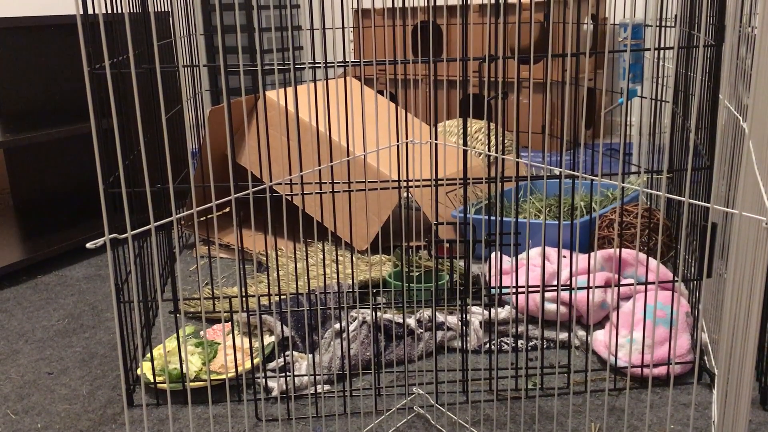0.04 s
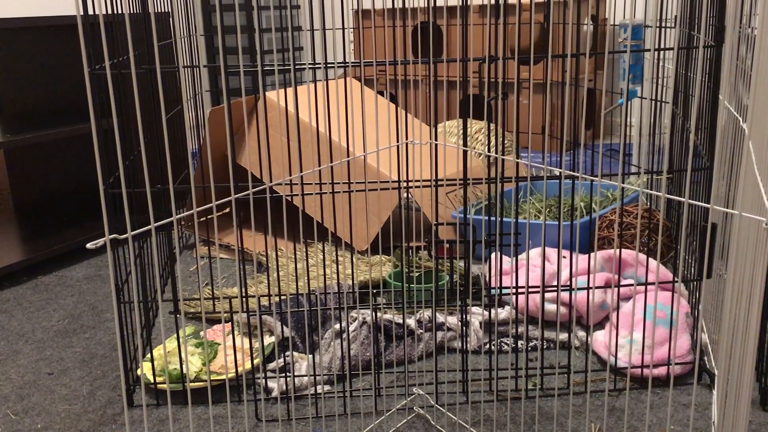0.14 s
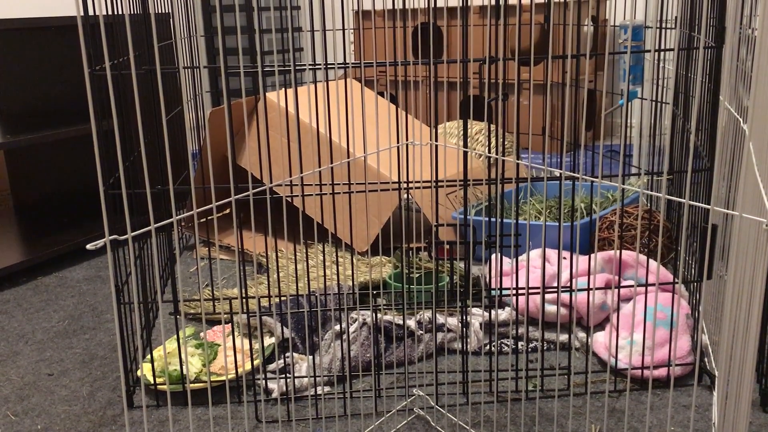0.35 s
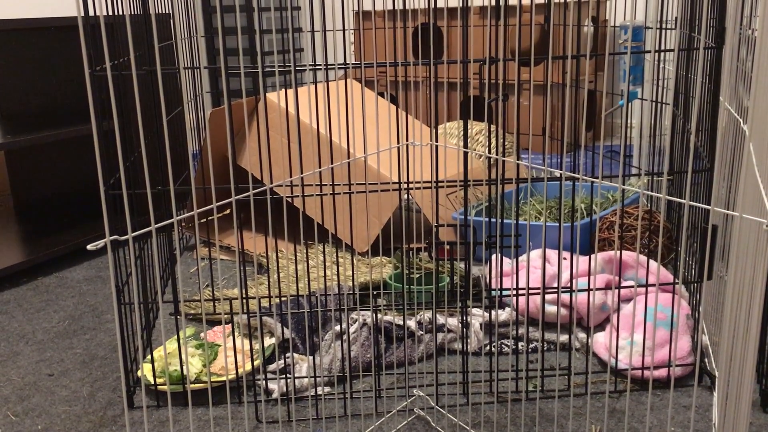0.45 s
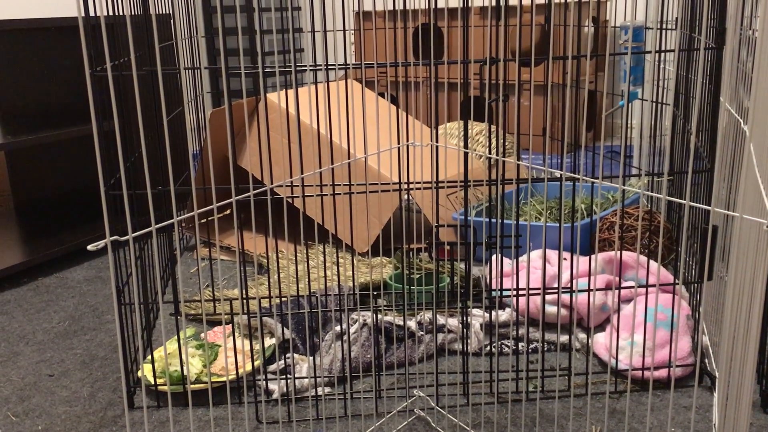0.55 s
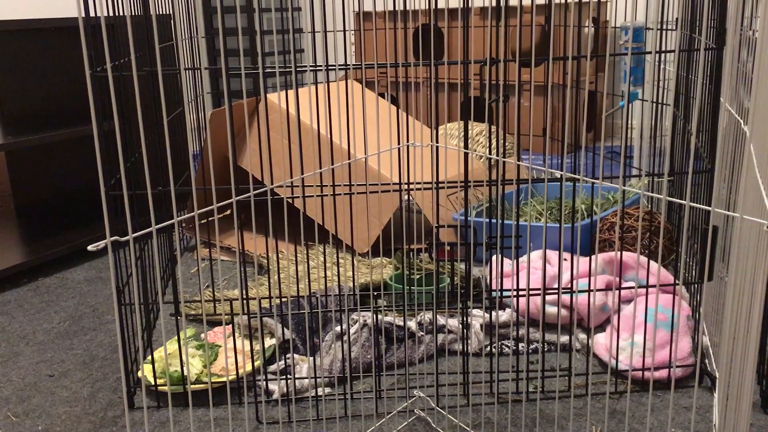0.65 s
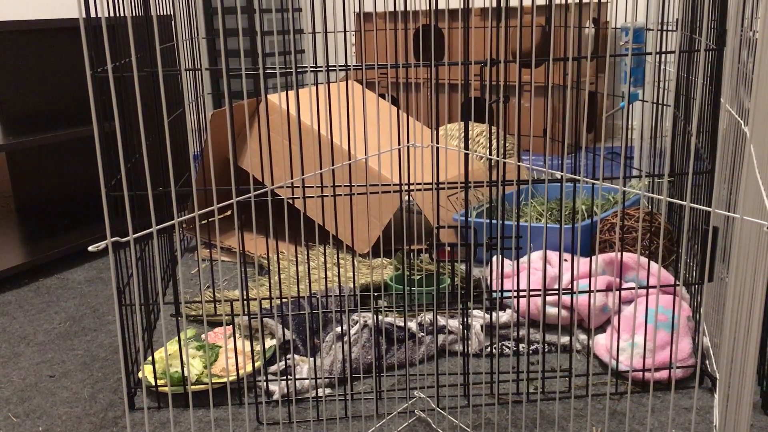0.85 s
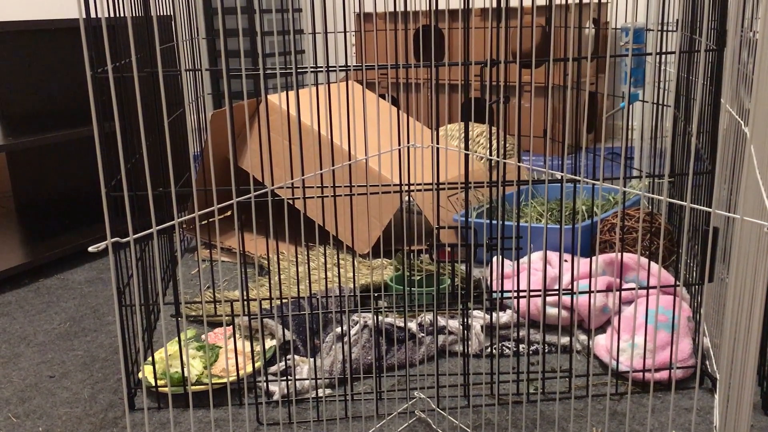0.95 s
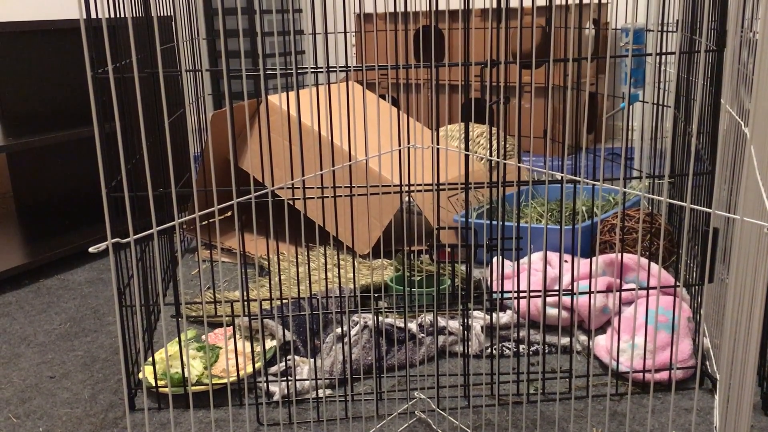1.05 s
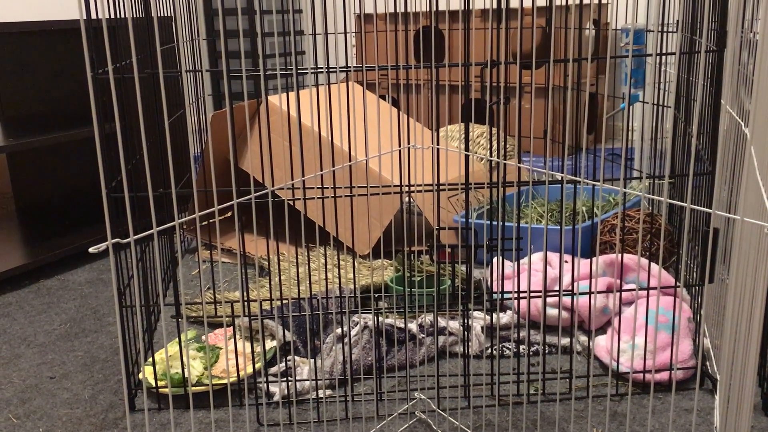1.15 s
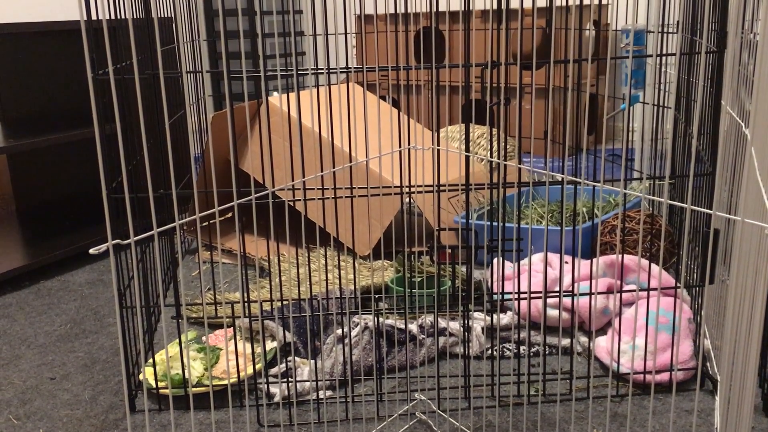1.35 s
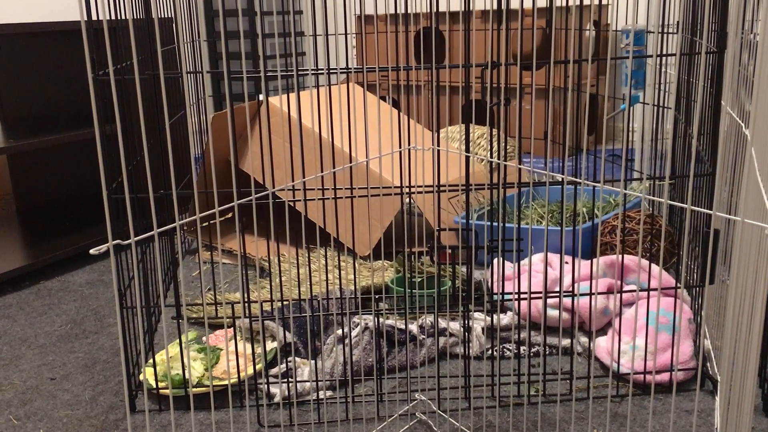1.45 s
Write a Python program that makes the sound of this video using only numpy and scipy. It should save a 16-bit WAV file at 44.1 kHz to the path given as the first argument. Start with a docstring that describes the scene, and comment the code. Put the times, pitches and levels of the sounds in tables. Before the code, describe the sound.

A single hollow thump lands at about 0.25 seconds, like a small animal stamping in a cardboard box. The floor booms softly beneath it, while hay and pen wire shiver, all fading by about 0.7 seconds. A low rumble and soft hiss fill the small, quiet room throughout. Very faint bedding rustles and dry ticks come near 0.8 seconds and again from 1.3 to 1.5 seconds.

```python
"""A hollow thump in a pet pen

One thump in a small quiet room, probably an animal stamping inside a cardboard house.
The box knocks, the floor under it booms a moment later, and loose hay and wire shiver while the
room rings out. Around it: a low room rumble, soft hiss and a few faint rustles and ticks of bedding."""
import sys
import numpy as np
from scipy import signal
from scipy.fft import rfft, irfft
from scipy.io import wavfile
from scipy.ndimage import uniform_filter1d

SR = 44100
rng = np.random.default_rng(int(sys.argv[2]) if len(sys.argv) > 2 else 0)


def wrap_up_sound(samples):
    """Save the sound to the file named by the first command line argument, as 16-bit audio."""
    columns = np.atleast_2d(samples).T
    # keep every value between -1 and 1, then stretch to whole-number steps
    tamed = np.clip(columns, -1, 1)
    steps = np.round(tamed * 32767).astype(np.int16)
    wavfile.write(sys.argv[1], SR, steps)


N = 66150
TIME = np.arange(N) / SR
THUMP_S = 0.2425
# The colour of dry bedding. Each row: frequency in Hz, relative level in dB.
BEDDING_COLOUR = [(300, -11.5), (1000, -1.5), (2000, 5), (4000, -1), (6500, -0.5), (9000, -6.5),
                  (16000, -13)]


def thump():
    """A hard tap sets the hollow box knocking; the floor booms just after and the room rings out."""
    # Modes of the contact, box and floor. Each row: frequency in Hz, level in dB, t60 in seconds.
    tap_modes = [(590.6, -34.5, 0.0682), (850.5, -36.5, 0.049), (978.2, -39.5, 0.084),
                 (1089, -32.5, 0.0305), (1220, -48, 0.048), (2020, -50, 0.065)]
    box_modes = [(246.17, -7, 0.0676), (301.26, -12.5, 0.0628), (349.14, -17.5, .108),
                 (411.7, -21.5, 0.114)]
    floor_modes = [(60.02, -14.5, 0.332), (61.19, -29, 0.823), (72.95, -19, 0.52), (95.1, -19, 0.263),
                   (107.14, -30.5, 0.244), (140.64, -27, 0.2487), (164.42, -32, 0.19)]
    # The room's answer. Each row: frequency in Hz, relative level in dB, t60 in seconds.
    tail_bands = [(120, -5.5, 0.56), (191, -7.5, 0.389), (262, 0.5, 0.325), (404, -3.5, 0.2235),
                  (599, -15, 0.216), (1105, -15.5, 0.264), (1370, -22.5, 0.285), (3010, -30, 0.234),
                  (16000, -48.5, 0.222)]
    tap = ring(tap_modes, THUMP_S, swell_s=0.00083)
    knock = ring(box_modes, THUMP_S + 0.000949, swell_s=0.0094)
    boom = ring(floor_modes, THUMP_S + 0.01569, swell_s=0.00925)
    tail = from_db(-31) * dying_noise(tail_bands, swell_s=0.0026)
    return tap + knock + boom + tail


def hay_and_wire():
    """Loose hay and wire snap at the blow, then shiver while the pen wires ring on."""
    # Shaken hay and wire. Each row: frequency in Hz, relative level in dB, t60 in seconds.
    shiver_bands = [(503, -22.5, 0.14), (1387, -5, 0.191), (2002, 9.5, 0.189), (2670, -3, 0.1624),
                    (3380, -2, 0.233), (4730, -9.5, 0.251), (5500, -3, 0.226), (6764, -5.5, 0.215),
                    (7470, -17.5, 0.281), (9000, -14.5, 0.303), (12000, -10.5, 0.229), (16000, -14.5, 0.19)]
    # Ringing pen wires. Each row: frequency in Hz, level in dB, t60 in seconds.
    wire_modes = [(3354, -62, 0.335), (3900, -64, 0.33), (5540, -61.5, .28), (5660, -73, 0.29),
                  (8410, -74, 0.38), (8643, -69.5, 0.62), (8730, -72, 0.47)]
    shiver = from_db(-41) * dying_noise(shiver_bands, swell_s=0.01008) * grain(depth_db=2.5)
    snap = from_db(-47.5) * struck(THUMP_S, swell_s=0.00019, t60=0.0202) * coloured_noise(shiver_bands)
    return snap + shiver + ring(wire_modes, THUMP_S, swell_s=0.0044)


def bedding_rustles():
    """Bedding rustles in short, faint swells of grainy hiss."""
    # Each row: centre in seconds, half length in seconds, level in dB, tilt in dB per octave.
    rustles = [(0.184, 0.0254, -67.5, 8), (0.382, 0.0244, -74.5, 3), (0.762, 0.0207, -75, 0),
               (0.811, 0.0276, -68, -4), (1.263, 0.013, -70.5, 0.5), (1.352, 0.077, -69.5, -4),
               (1.498, 0.0105, -59.5, 1.87)]
    sound = np.zeros(N)
    for centre_s, half_s, db, tilt_db in rustles:
        swell = np.exp(-((TIME - centre_s) / half_s) ** 2 / 2)
        sound += from_db(db) * swell * coloured_noise(BEDDING_COLOUR, tilt_db) * grain(depth_db=3)
    return sound


def hay_ticks():
    """Single stalks give tiny, bright, dry ticks."""
    # Each row: start in seconds, level in dB.
    ticks = [(.931, -74.5), (1.4, -64)]
    envelope = sum(from_db(db) * struck(start_s, swell_s=0.00026, t60=0.041) for start_s, db in ticks)
    return envelope * coloured_noise(BEDDING_COLOUR, tilt_db=13.5)


def room_tone():
    """A wavering low rumble under a steady hiss."""
    # The colours of rumble and hiss. Each row: frequency in Hz, relative level in dB.
    rumble_colour = [(20, -32.5), (40, -20.5), (60, 0), (78, -0.5), (105, -8.5), (170, -17), (300, -40.5),
                     (600, -73.5)]
    hiss_colour = [(20, -40), (80, -19), (120, -10.5), (170, -9.5), (215, -18.5), (290, -19.5), (400, -24),
                   (480, -32), (650, -25.5), (790, -34), (890, -30), (1200, -31.5), (1380, -36.5),
                   (1600, -33), (2100, -38), (2600, -44), (3100, -41.5), (4000, -44), (5500, -47.5),
                   (6600, -46.5), (7700, -51), (11500, -52.5), (16000, -59)]
    # The rumble's rise and fall. Each row: time in seconds, level in dB.
    rumble_levels = [(0, -50), (.2, -53), (.55, -49.5), (.85, -54), (.97, -45.5), (1.12, -54), (1.24, -49),
                     (1.32, -55), (1.38, -46), (1.5, -48.5)]
    rumble_db = np.interp(TIME, *np.transpose(rumble_levels))
    rumble = from_db(rumble_db) * coloured_noise(rumble_colour)
    return rumble + from_db(-57) * coloured_noise(hiss_colour)


def ring(modes, start_s, swell_s):
    """A struck body; its lowest mode swings against the higher ones."""
    swings = [from_db(db) * struck(start_s, swell_s, t60) * np.sin(2 * np.pi * hz * (TIME - start_s))
              for hz, db, t60 in modes]
    return swings[0] - sum(swings[1:])


def dying_noise(table, swell_s):
    """Third-octave bands of noise set off by the thump, each with its own decay."""
    edges = 140 * 2 ** (np.arange(22) / 3)
    centres = np.sqrt(edges[1:] * edges[:-1])
    hz = np.arange(N // 2 + 1) * SR / N
    spectrum = rfft(rng.standard_normal(N)) * from_db(at_hz(table, hz))
    bands = [irfft(spectrum * (hz >= lo) * (hz < hi), N) for lo, hi in zip(edges, edges[1:])]
    t60s = at_hz(table, centres, column=2)
    burst = sum(band * struck(THUMP_S, swell_s, t60) for band, t60 in zip(bands, t60s))
    return burst / np.std(sum(bands))


def struck(start_s, swell_s, t60):
    """An envelope that swells, then dies away by 60 dB every t60 seconds."""
    age = np.maximum(TIME - start_s, 0)
    return (1 - np.exp(-age / swell_s)) * from_db(-60 * age / t60)


def grain(depth_db):
    """A gain that jumps about from one millisecond to the next."""
    flicker = rms_one(uniform_filter1d(rng.standard_normal(N), size=60))
    return rms_one(from_db(depth_db * flicker))


def coloured_noise(colour, tilt_db=0):
    """Noise of the given colour, tilted by tilt_db per octave; rms 1."""
    hz = np.maximum(np.arange(N // 2 + 1) * SR / N, 1)
    gain = from_db(at_hz(colour, hz) + tilt_db * np.log2(hz))
    return rms_one(irfft(rfft(rng.standard_normal(N)) * gain, N))


def at_hz(table, hz, column=1):
    """One column of a table, read along log frequency."""
    table = np.array(table)
    return np.interp(np.log(np.maximum(hz, 1)), np.log(table[:, 0]), table[:, column])


def from_db(db):
    return 10 ** (np.asarray(db) / 20)


def rms_one(x):
    return x / np.sqrt(np.mean(x ** 2) + 1e-20)


def scene():
    """All sources at one microphone."""
    return (room_tone() + thump() + hay_and_wire() + bedding_rustles() + hay_ticks())[None]


def record(dry):
    """The microphone has a narrow dip in the treble; the top is cut steeply."""
    dip_hz, dip_share, cutoff_hz = 10393, 0.514, 15800
    dip_band = signal.lfilter(*signal.iirpeak(dip_hz, Q=15.3, fs=SR), dry)
    lowpass = signal.ellip(12, 0.1, 80, cutoff_hz, fs=SR, output="sos")
    return signal.sosfilt(lowpass, dry - dip_share * dip_band)


dry = scene()
out = record(dry)
wrap_up_sound(out)
```